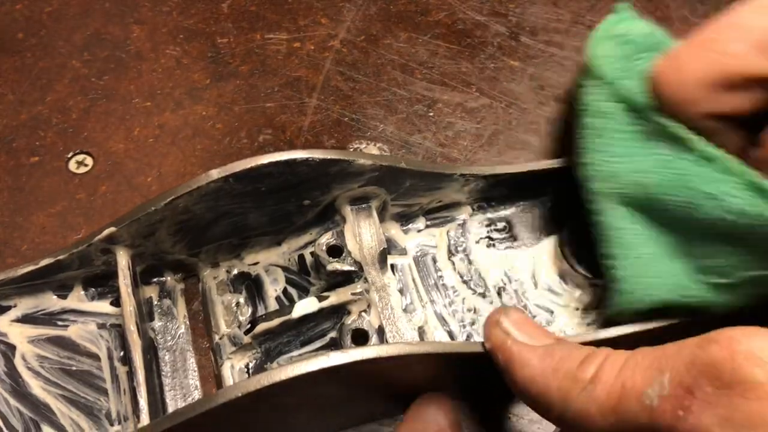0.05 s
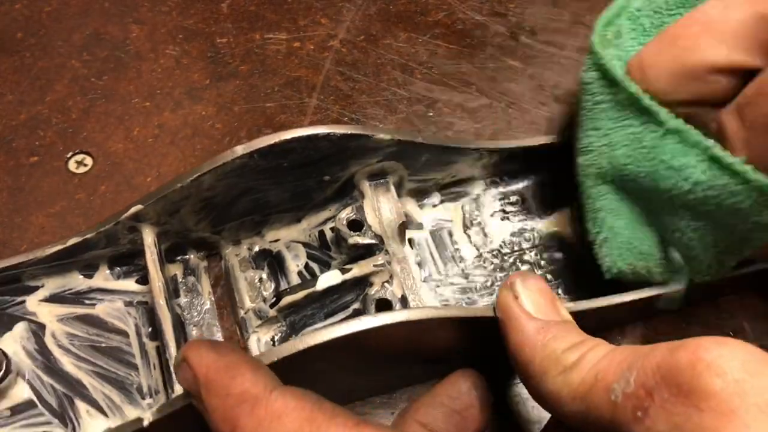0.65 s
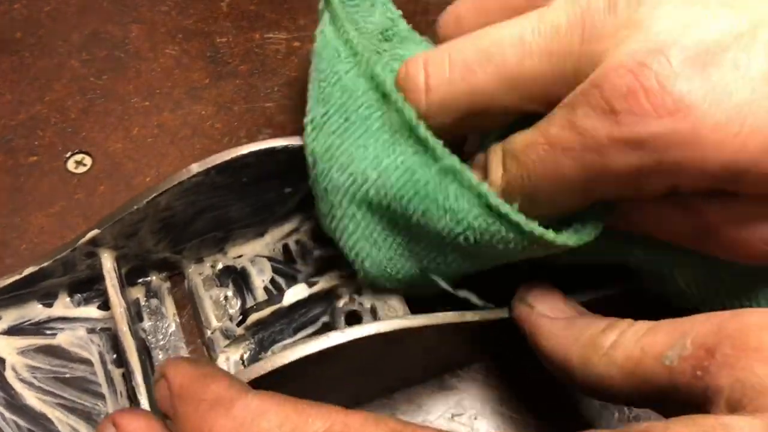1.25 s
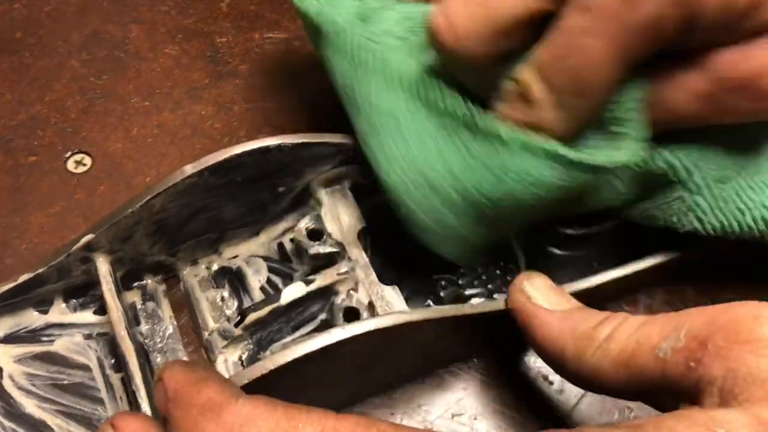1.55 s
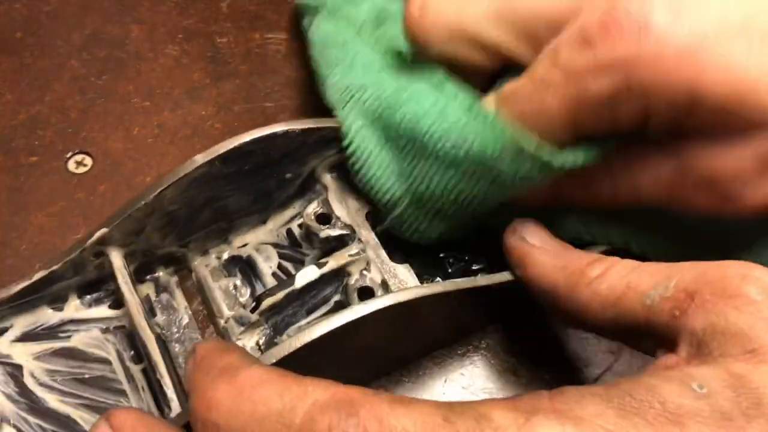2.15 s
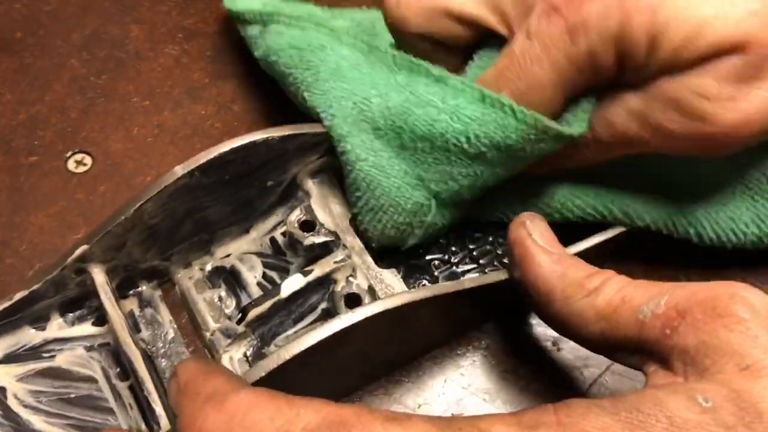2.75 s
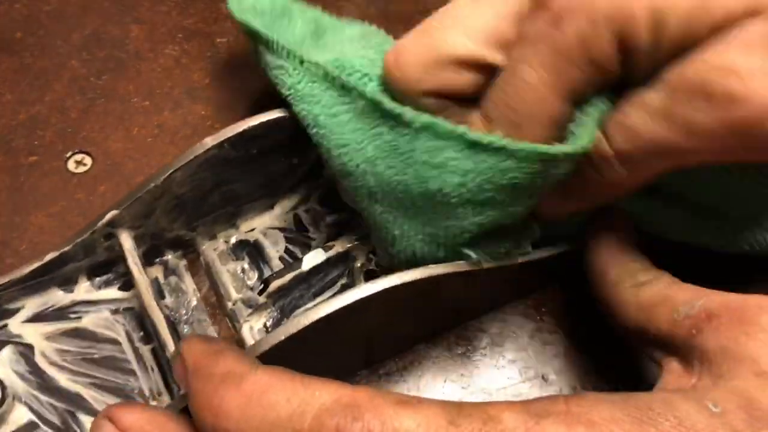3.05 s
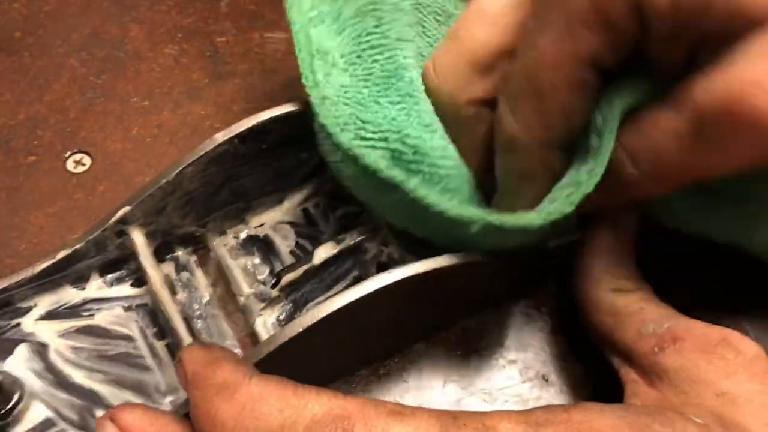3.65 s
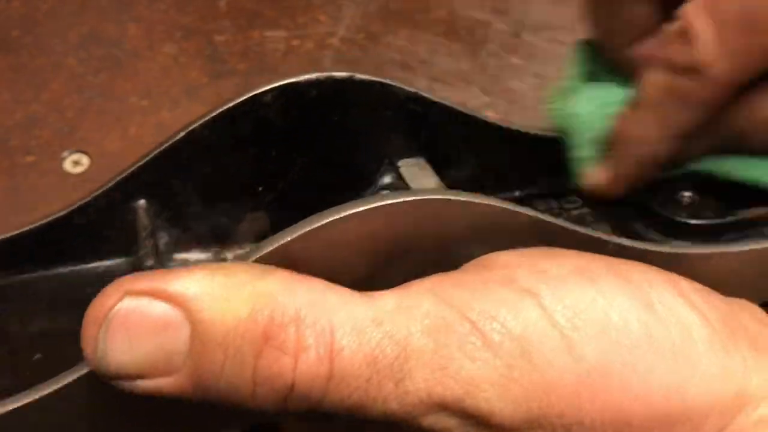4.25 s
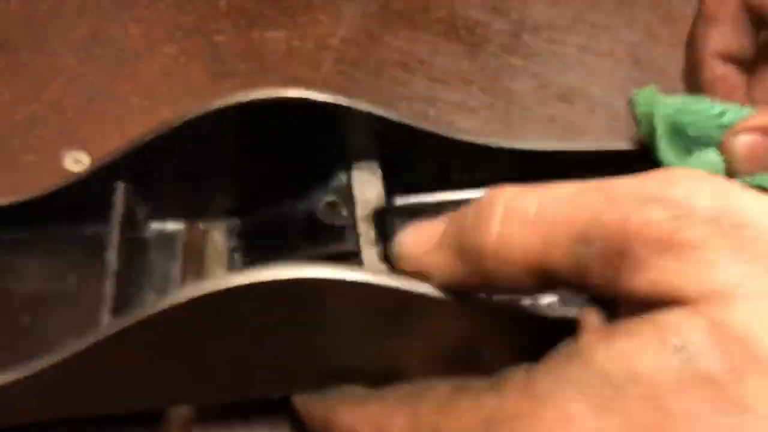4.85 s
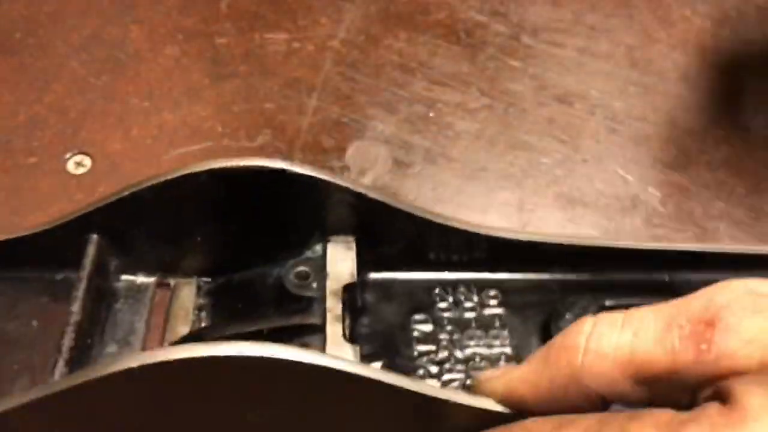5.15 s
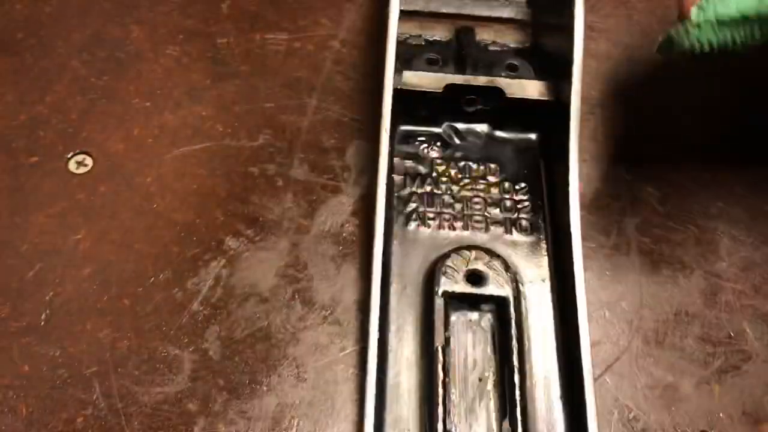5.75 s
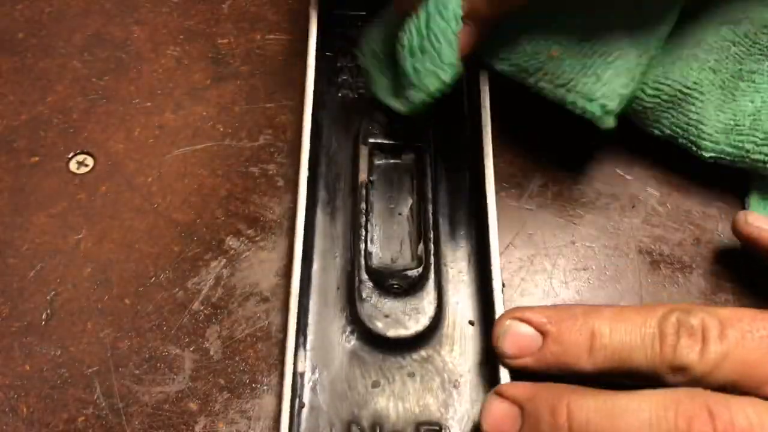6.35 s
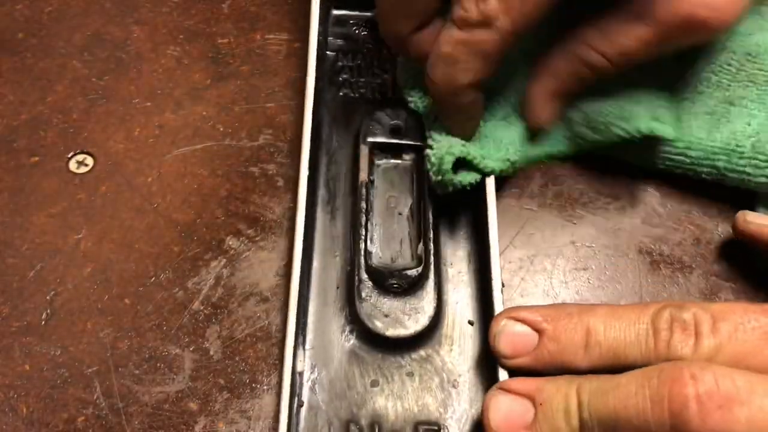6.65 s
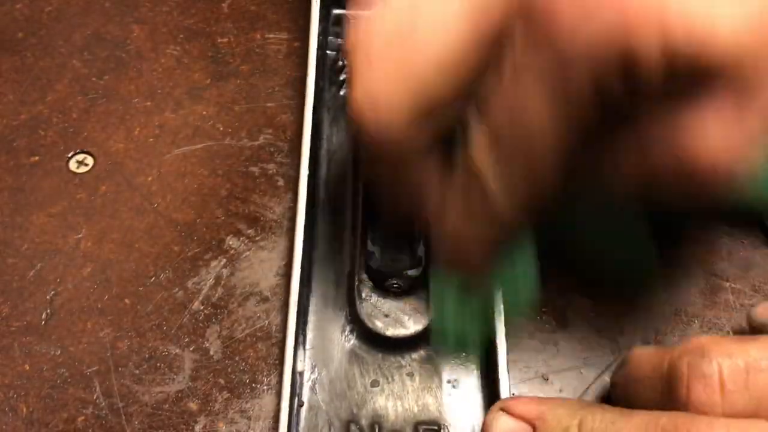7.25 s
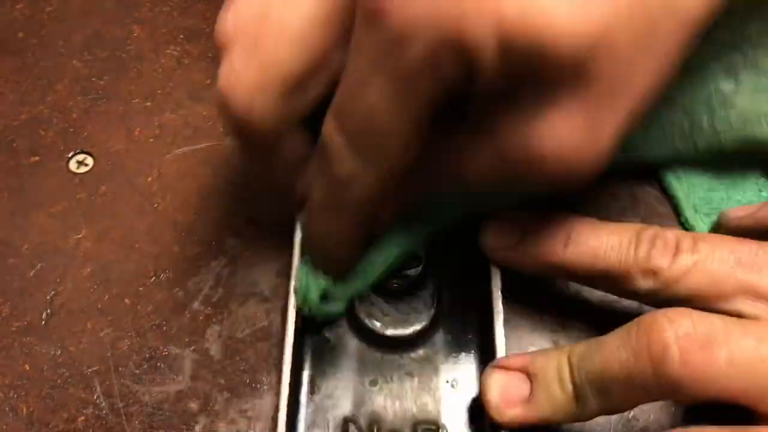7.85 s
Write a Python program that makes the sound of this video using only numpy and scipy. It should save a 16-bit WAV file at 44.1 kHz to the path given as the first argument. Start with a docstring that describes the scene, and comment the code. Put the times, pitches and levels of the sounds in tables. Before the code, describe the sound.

A cloth rag rubs quickly back and forth over a metal tool body, which clacks down and scrapes on a wooden bench midway.

```python
"""Quick to-and-fro wipes hiss over metal, close to the microphone: a cloth rag buffs polish off the
cast-iron body of a hand plane on a wooden workshop bench. Each stroke rocks the casting, and the bench
rumbles under it. Midway the casting is knocked and set down, ringing and clacking, then dragged round,
its sole grinding over wood and grit; then the wiping goes on."""
import sys
import numpy as np
from scipy import signal
from scipy.fft import rfft, irfft, next_fast_len
from scipy.io import wavfile
from scipy.ndimage import uniform_filter1d

SR = 44100
rng = np.random.default_rng(int(sys.argv[2]) if len(sys.argv) > 2 else 0)


def wav_record(signal):
    """Record a signal, one row per channel, as 16-bit PCM in the file named by sys.argv[1]."""
    frames = np.transpose(np.atleast_2d(signal))
    bounded = np.clip(frames, -1, 1)
    # unit amplitude maps onto the largest positive 16-bit level
    quanta = np.round(bounded * 32767).astype(np.int16)
    wavfile.write(sys.argv[1], SR, quanta)


N = 353241
TIME = np.arange(N) / SR
FFT_SIZE = 2 * next_fast_len(N // 2 + 1, True)
HZ = np.fft.rfftfreq(FFT_SIZE, 1 / SR)
BAND_LIMIT_HZ = 15760

# modes of the casting and of the bench top: pitch_hz, width_hz, level_db
IRON_MODES = [(554.5, 60, -5), (890, 90, -18.5), (980, 50, -8), (1130, 32, -9.5), (1550, 76, -1),
              (1908, 44, -7), (2580, 48, -2.5), (2640, 37, -2), (2880, 30, -9), (3084, 31, 1),
              (3375, 76, -6.5), (3240, 38, -13.5), (3764, 99, -22), (4400, 67, -28.5), (4550, 38, -24),
              (5008, 22, -23), (5205, 130, -12.5), (5600, 89, -20), (7810, 49, -31), (8100, 82, -27),
              (8730, 90, -14.5), (9400, 51, -27)]
BENCH_MODES = [(66, 14, 1), (128, 50, -1.5), (165, 40, 3), (189, 19, 1.5), (310.6, 58, -11.5),
               (530, 63, -4.5), (606, 70, -15)]
# the sole scuffs the bench as it is tilted and set down: middle_s, length_s, grind_db, grit_db, chatter_db
SOLE_SCUFFS = [(4.815, 0.016, -33.5, -34.5, -23.5), (4.846, 0.031, -35.5, -42.5, -36),
               (4.955, 0.099, -56.5, -61, -78), (5.041, 0.023, -36.5, -52.5, -51),
               (5.091, 0.03, -37.5, -65, -61.5), (5.142, .04, -52.5, -69, -67.5),
               (5.233, 0.022, -31.5, -45, -57.5)]


def amp(db):
    """Decibels to gain."""
    return 10 ** (np.asarray(db) / 20)


def unit_rms(x):
    """Scales to rms 1."""
    return x / np.sqrt(np.mean(x ** 2) + 1e-20)


def later(curve, delay_s):
    """Delays a curve."""
    return np.interp(TIME - delay_s, TIME, curve)


def power_sum(*gains):
    """Unrelated shakings add in power."""
    return np.sqrt(sum(gain ** 2 for gain in gains))


def log_interp(points, hz):
    """Joins (frequency, value) points on a log-frequency axis."""
    point_hz, value = np.transpose(points)
    return np.interp(np.log(hz + 1), np.log(point_hz + 1), value)


def colour(points):
    """Gain for each frequency of a dB spectrum."""
    return amp(log_interp(points, HZ))


def response(modes, patch_hz=9000):
    """Modal peaks with deep notches between; the width of the contact patch dulls all above patch_hz."""
    peaks = sum(amp(db) * 1j * HZ * width / (hz ** 2 - HZ ** 2 + 1j * HZ * width)
                for hz, width, db in modes)
    return peaks / (1 + (HZ / patch_hz) ** 6)


def shaped(x, gain):
    """Filters x, keeping the audible power of white noise."""
    power = np.mean(abs(gain) ** 2 * (HZ < BAND_LIMIT_HZ))
    return irfft(rfft(x, FFT_SIZE) * gain / np.sqrt(power), FFT_SIZE)[:N]


def swells(rows):
    """Each movement speeds up and slows down in a bell; gives one gain curve per level column."""
    rows, t = np.array(rows), TIME[::64]
    from_middle = (t - rows[:, :1]) / rows[:, 1:2]
    powers = (amp(rows[:, 2:]) ** 2).T @ (1 + from_middle ** 2) ** -5
    return [np.sqrt(np.interp(TIME, t, power)) for power in powers]


def friction(snags_per_s, snag_share):
    """Countless tiny slips, with some larger snags of uneven size among them."""
    size = amp(3 * np.minimum(rng.exponential(1, N), 4))
    snags = size * rng.choice([-1, 1], N) * (rng.random(N) < snags_per_s / SR)
    return np.sqrt(1 - snag_share) * rng.standard_normal(N) + np.sqrt(snag_share) * unit_rms(snags)


def hand_strokes(return_early_s=0.0013, return_db=0.43, ease_db=1.64, pitch_spread=0.13):
    """Single wipes and spells of scrubbing, in time order; return strokes come early and harder."""
    # single wipes: middle_s, length_s, drag_db, hiss_db, fizz_db, pitch_hz
    wipes = [(0.241, 0.032, -45, -50, -61, 2800), (0.703, 0.032, -51.5, -53, -60, 2900),
             (0.836, 0.039, -63, -59.5, -60, 3400), (0.929, 0.058, -59, -63.5, -61, 4000),
             (1.04, 0.23, -68.5, -68.5, -64.5, 3600), (1.112, 0.03, -55.5, -61, -75, 2800),
             (1.228, 0.056, -61.5, -60, -70, 3000), (1.287, 0.042, -68, -58, -61.5, 3800),
             (1.53, 0.068, -58.5, -64, -66, 3200), (1.64, 0.14, -78, -67, -65, 3100),
             (1.72, 0.037, -44, -52, -59, 3300), (1.807, 0.066, -57, -60, -62, 3000),
             (1.878, 0.041, -59, -62, -70, 3000), (2.081, 0.025, -56, -73, -78, 2500),
             (2.304, 0.02, -58.5, -58, -72, 3300), (2.004, 0.043, -61, -81, -68, 3600),
             (2.793, 0.043, -52.5, -53, -61, 3600), (2.907, 0.11, -66, -70.5, -63, 4000),
             (3.094, 0.027, -55.5, -60, -60, 2900), (3.163, 0.082, -74.5, -68.5, -63.5, 4000),
             (3.216, 0.026, -74, -73, -59.5, 4300), (3.333, 0.1, -70, -69, -69.5, 3500),
             (3.638, 0.063, -56, -56, -64, 3000), (3.902, 0.032, -56, -56, -59.5, 1800),
             (4.221, 0.073, -68, -59.5, -57.5, 4000), (4.377, 0.08, -70, -75, -66, 4000),
             (4.479, 0.1, -63.5, -56, -60, 3100), (4.697, 0.098, -65.5, -60.5, -56, 3600),
             (4.921, 0.087, -69.5, -72.5, -63.5, 2270), (5.835, 0.037, -55, -57, -63, 2300),
             (5.91, 0.06, -78, -78, -62.5, 3500), (6.229, 0.06, -68.5, -70, -73, 2930),
             (6.711, 0.047, -69.5, -57, -60, 3900), (6.908, 0.04, -70, -53, -57, 4500),
             (7.478, 0.1, -75, -74, -70.5, 3100), (7.655, 0.048, -65.5, -49.5, -52.5, 6320)]
    # to-and-fro spells: first_s, last_s, rough_period_s, length_s, drag_db, hiss_db, fizz_db, pitch_hz
    spells = [(0.035, 0.788, .093, 0.047, -58, -57, -59.5, 2640),
              (1.374, 1.537, .058, 0.03, -66.5, -63.5, -61.5, 3700),
              (2.051, 2.711, .073, 0.032, -62, -59, -56, 4260),
              (6.391, 6.577, .093, 0.045, -71.5, -67, -65, 3590),
              (6.762, 7.328, .08, 0.04, -66.5, -53.5, -56, 4870),
              (7.702, 8.022, 0.081, 0.036, -63, -52, -51.5, 4770)]
    scrubs = []
    for first, last, period, length, *levels_db, hz in spells:
        middles = np.linspace(first, last, round((last - first) / period) + 1)
        for k, (s, place) in enumerate(zip(middles, np.linspace(-1, 1, len(middles)))):
            back = 1 if k % 2 else -1
            effort_db = return_db * back - ease_db * place ** 2  # the spell eases in and out
            pitch_hz = hz * np.exp(pitch_spread * rng.standard_normal())
            scrubs.append((s - return_early_s * back, length, *np.add(levels_db, effort_db), pitch_hz))
    return np.array(sorted(scrubs + wipes))


def trough():
    """Gain of the air resonating between the side walls of the casting."""
    # air resonances: pitch_hz, width_hz, lift_db
    air_modes = [(870, 110, 0.5), (1780, 100, -3), (2333, 250, -3), (2930, 130, 3), (3654, 220, 5.5),
                 (4250, 130, 2.5), (4640, 150, 3.5), (4890, 250, -2.5), (6230, 270, 2), (7720, 250, -7.5),
                 (8640, 460, 1), (10480, 700, -5)]
    return amp(sum(db / (1 + (2 * (HZ - hz) / width) ** 2) for hz, width, db in air_modes))


def air_pocket(x, pitch_hz, width_hz):
    """The air under the fingers resonates at a moving pitch: shift down to zero, smooth, shift back."""
    carrier = np.exp(2j * np.pi * np.cumsum(pitch_hz) / SR)
    pole = np.exp(-np.pi * width_hz / SR)
    return unit_rms((carrier * signal.lfilter([1 - pole], [1, -pole], x / carrier)).real)


def rag(strokes):
    """The finger drags on the casting, the weave swishes and loose fibres fizz, all inside the trough."""
    # spectra of finger, weave and fibres: frequency_hz, level_db
    drag_spectrum = [(60, -17.5), (190, -2), (260, -6), (350, -1), (480, -12), (600, -5), (740, -5.5),
                     (860, -0.5), (1100, -2.5), (1600, -11), (3000, -25.5), (5000, -21), (12000, -51)]
    hiss_spectrum = [(500, -24.5), (1500, 1), (2000, 3), (2900, 0.5), (3700, -1), (5200, -1.5),
                     (6800, -1.5), (7700, -0.5), (9000, -1), (10500, -8), (16000, -4.5)]
    fizz_spectrum = [(400, -16.5), (1500, -14.5), (4000, -7.5), (6700, 0), (7700, -0.5), (8900, 0.5),
                     (10400, 1), (11800, 1.5), (16000, 1)]
    drag, hiss, fizz = swells(strokes[:, :-1])
    cavity = trough()
    pitch_hz = np.interp(TIME, strokes[:, 0], strokes[:, -1])
    swish = air_pocket(friction(snags_per_s=2200, snag_share=0.2), pitch_hz, width_hz=3200)
    finger = shaped(drag * friction(snags_per_s=770, snag_share=0.19), colour(drag_spectrum) * cavity)
    weave = amp(-2.5) * shaped(hiss * swish, colour(hiss_spectrum) * cavity)
    fibres = shaped(fizz * friction(snags_per_s=4700, snag_share=0.2), colour(fizz_spectrum) * cavity)
    return finger + weave + fibres


def judder(gain, steady_s):
    """Low random shaking whose strength stays even."""
    shake = shaped(rng.standard_normal(N), gain)
    power = uniform_filter1d(shake ** 2, int(steady_s * SR) + 1)
    return shake / np.sqrt(abs(power) + 1e-6)


def rocking(strokes):
    """The bench rumbles and its top knocks hollowly under every stroke, bump, scuff and push."""
    # how loosely the casting sits: time_s, rocking_over_drag_db
    looseness = [(0, -3.5), (0.92, -14.5), (1.4, 9), (1.9, -2), (2.3, 9), (2.9, 3.5), (3.45, -2.5),
                 (3.9, -21), (4.7, -6), (6.3, -1), (7.3, 2), (8, 4.5)]
    # the casting tips and bumps the bench: middle_s, length_s, rumble_db, hollow_db
    bumps = [(0.255, 0.049, -56, -52.5), (0.337, 0.027, -57, -52.5), (0.522, 0.04, -61, -54),
             (0.705, 0.033, -63, -48.5), (1.125, 0.03, -44, -47), (1.23, 0.03, -50, -40),
             (1.553, 0.023, -60, -46), (1.632, 0.025, -50, -47.5), (1.742, 0.062, -45, -43),
             (2.292, 0.029, -49, -48), (2.587, 0.025, -41.5, -53), (2.715, 0.037, -41.5, -45.5),
             (2.85, 0.074, -53.5, -52.5), (3.01, 0.026, -50, -69), (3.102, 0.016, -59, -45),
             (3.645, 0.061, -59.5, -51), (4.868, 0.022, -46, -33.5), (5.05, 0.03, -36, -31),
             (5.242, 0.022, -25, -27), (5.411, 0.017, -62, -38.5), (6.136, 0.027, -49, -53),
             (7.267, 0.05, -51.5, -57.5)]
    # spectra of the deep rumble and the hollow top: frequency_hz, level_db
    rumble_spectrum = [(15, -47.5), (32, -9.5), (50, 6.5), (65, -5), (115, -0.5), (150, -7), (250, -30.5),
                       (900, -50), (3000, -77)]
    hollow_spectrum = [(40, -35), (110, -6.5), (155, -12.5), (190, 5.5), (225, -11.5), (260, -10.5),
                       (310, -10.5), (375, -10), (480, -25), (620, -22), (900, -22), (3000, -60)]
    drag, push = swells(strokes[:, :-1])[0], pushes()
    rock = later(drag, delay_s=0.015) * amp(np.interp(TIME, *np.transpose(looseness)))
    # each scuff jolts the bench, which then settles in a longer, weaker shudder
    jolt = amp(7.5) * later(swells(SOLE_SCUFFS)[0], delay_s=0.0056)
    settle, = swells([(s + 0.04, 0.1, grind_db - 12.5) for s, _, grind_db, *_ in SOLE_SCUFFS])
    bump_rumble, bump_hollow = swells(bumps)
    rumble = power_sum(bump_rumble, amp(1.5) * rock, amp(-17) * push)
    hollow = power_sum(bump_hollow, amp(-0.5) * rock, amp(-6) * push, settle)
    return (rumble * judder(colour(rumble_spectrum), steady_s=0.064)
            + hollow * judder(colour(hollow_spectrum), steady_s=0.022)
            + jolt * judder(response(BENCH_MODES, patch_hz=600), steady_s=0.011))


def blow(ring, hardness_hz):
    """A body's ring, peak 1, after a contact too soft to reach its higher modes."""
    ring = signal.sosfilt(signal.butter(6, hardness_hz, fs=SR, output="sos"), ring)
    return ring / abs(ring).max()


def knocks():
    """Each landing thuds in the bench, rings the casting and clacks under its sole."""
    # the casting lands: start_s, thud_db, ring_db, clack_db, hardness_hz
    landings = [(1.732, -37, -45, -49, 1500), (2.583, -53, -72, -65, 1000),
                (4.811, -15, -24.5, -18.5, 5000), (4.817, -11, -14, -43, 3530),
                (5.041, -35.5, -28, -26, 3500), (5.048, -19, -39, -30, 1200),
                (5.213, -41, -44.5, -31.5, 1500), (5.224, -34.5, -40, -16.5, 1480),
                (5.2285, -32.5, -35, -8.5, 1155), (5.232, -18.5, -35, -25, 695),
                (5.247, -18, -39, -30.5, 805), (6.137, -53, -69, -62, 883)]
    # modes of the flat sole slapping the bench: pitch_hz, width_hz, level_db
    sole_modes = [(644, 120, -9), (873, 160, -5), (1210, 250, -12)]
    clack = response(sole_modes) ** 2  # the clack swells in softly over a cycle or two
    bodies = response(BENCH_MODES), response(IRON_MODES), clack
    rings = [irfft(body, FFT_SIZE)[:SR // 2] for body in bodies]
    out = np.zeros(N)
    for start_s, *levels_db, hardness_hz in landings:
        sound = sum(amp(db) * blow(ring, hardness_hz) for db, ring in zip(levels_db, rings))
        span = out[round(start_s * SR):][:len(sound)]
        span += sound[:len(span)]
    return out


def pushes():
    """Effort of dragging the casting round in two pushes, as a gain; nothing between them."""
    # one curve a push: time_s, effort_db
    efforts = [
        [(5.3, -65.5), (5.352, -43), (5.44, -40), (5.574, -50.5), (5.636, -67), (5.66, -76)],
        [(5.95, -70), (5.982, -49), (6.004, -40), (6.044, -39.5), (6.15, -70)],
    ]
    return sum(amp(np.interp(TIME, *np.transpose(curve), left=-np.inf, right=-np.inf))
               for curve in efforts)


def sliding():
    """The sole grinds over wood and grit, and its edge chatters into the modes of the iron."""
    # spectra of the sole on wood and on grit: frequency_hz, level_db
    wood_spectrum = [(60, -11), (200, -9.5), (480, -4), (620, -6), (740, 2), (860, 5.5), (1050, 0),
                     (1500, -1), (2200, -7), (3200, -15.5), (5000, -34.5), (12000, -56)]
    grit_spectrum = [(300, -27), (1200, -3.5), (2200, 1), (3000, -5), (3600, -5), (5000, -10), (6200, -12),
                     (8000, -16.5), (10400, -20.5), (13000, -18), (16000, -22.5)]
    push = pushes()
    push_onset = np.maximum(push - later(push, delay_s=0.059), 0)
    scuff_grind, scuff_grit, scuff_chatter = swells(SOLE_SCUFFS)
    grind = power_sum(scuff_grind, amp(-2) * push)
    grit = power_sum(scuff_grit, amp(-0.5) * later(push, delay_s=0.0026))
    chatter = power_sum(scuff_chatter, amp(-8) * push_onset)
    return (shaped(grind * friction(snags_per_s=770, snag_share=0.42), colour(wood_spectrum))
            + shaped(grit * friction(snags_per_s=1500, snag_share=0.28), colour(grit_spectrum) * trough())
            + shaped(chatter * friction(snags_per_s=750, snag_share=0.21), response(IRON_MODES)))


def workshop(x, wet_db):
    """The room adds a short diffuse tail, briefest in the bass."""
    # reverberation: frequency_hz, t60_s
    decay_times = [(150, 0.14), (1000, .25), (5000, .2), (14000, 0.48)]
    hz, t, noise = signal.stft(rng.standard_normal(SR // 2), SR, nperseg=256)
    decay = amp(-60 * t / log_interp(decay_times, hz)[:, None])
    tail = signal.istft(noise * decay, SR, nperseg=256)[1]
    tail[:SR // 200] = 0  # 5 ms before the first reflection
    return x + amp(wet_db) * signal.fftconvolve(x, tail / np.linalg.norm(tail))[:N]


def scene():
    """Rag, casting and bench, close up and in mono, over quiet room tone."""
    # room tone: frequency_hz, level_db
    room_spectrum = [(15, -33.5), (30, -12.5), (60, 1), (120, -7), (250, -16.5), (1000, -21.5), (2000, -24),
                     (5000, -27.5), (16000, -31.5)]
    strokes = hand_strokes()
    work = rag(strokes) + rocking(strokes) + sliding() + knocks()
    room_tone = amp(-66) * shaped(rng.standard_normal(N), colour(room_spectrum))
    return (workshop(work, wet_db=-24) + room_tone)[None]


def record(dry, low_cut_hz=38):
    """The microphone sheds the deepest bass, the level dips briefly once, and the top treble is cut."""
    heard = signal.sosfilt(signal.butter(3, low_cut_hz, "high", fs=SR, output="sos"), dry)
    dip = amp(np.interp(TIME, [3.738, 3.752, 3.772], [0, -24, 0]))
    high_cut = signal.firwin(911, BAND_LIMIT_HZ, window=("kaiser", 9), fs=SR)
    return signal.oaconvolve(heard * dip, high_cut[None], "same")


dry = scene()
out = record(dry)
wav_record(out)
```